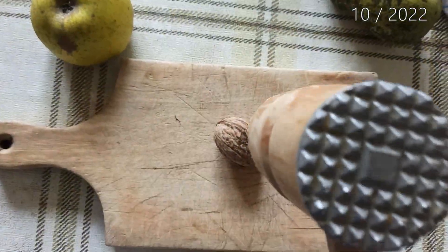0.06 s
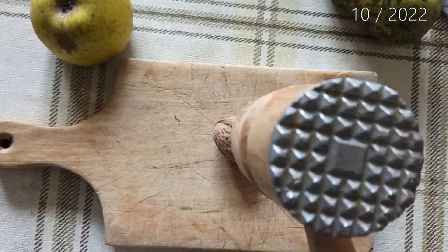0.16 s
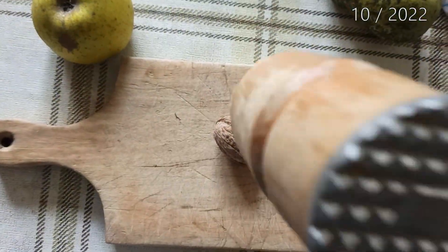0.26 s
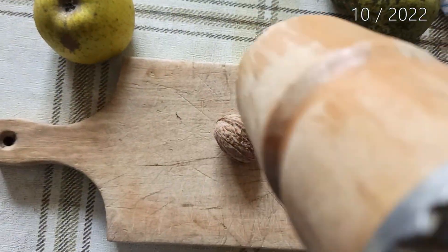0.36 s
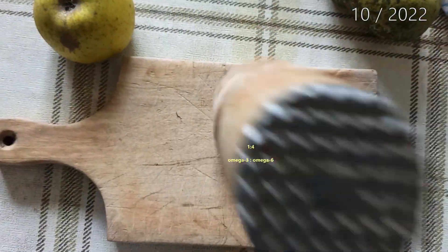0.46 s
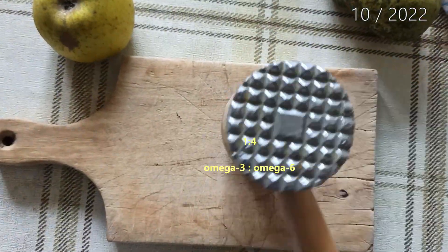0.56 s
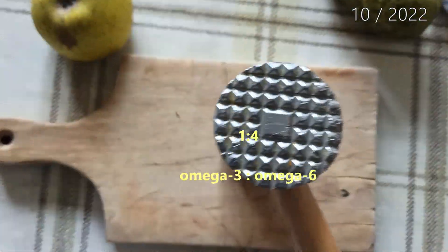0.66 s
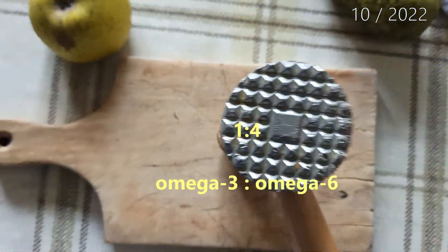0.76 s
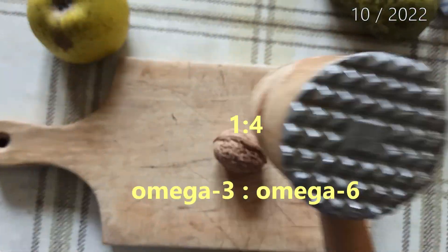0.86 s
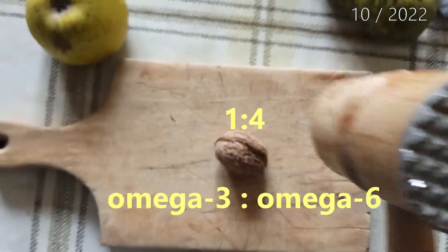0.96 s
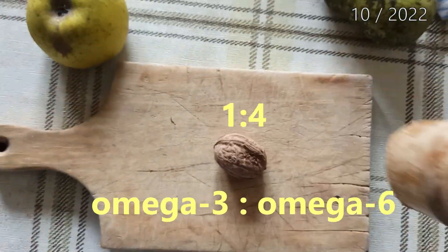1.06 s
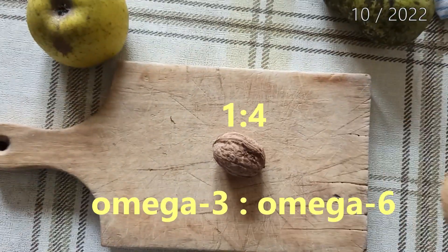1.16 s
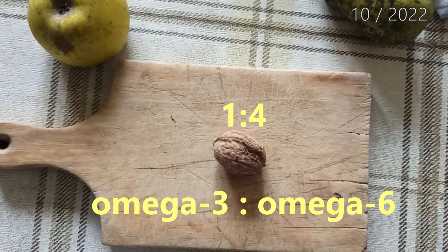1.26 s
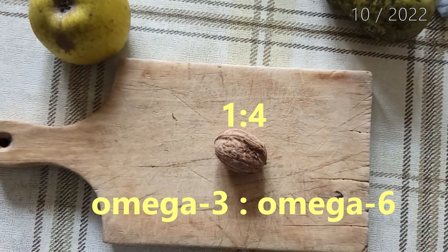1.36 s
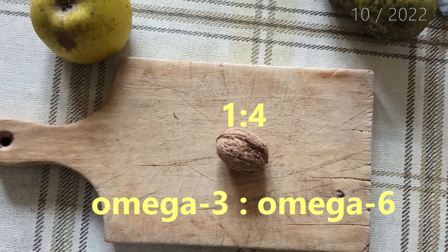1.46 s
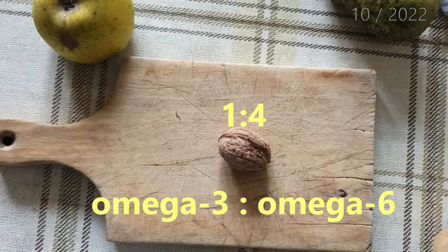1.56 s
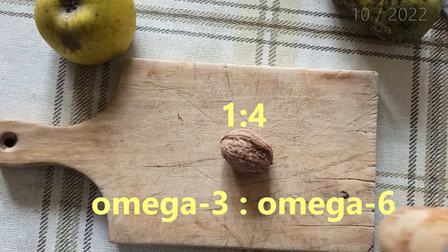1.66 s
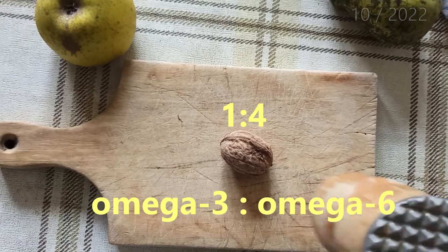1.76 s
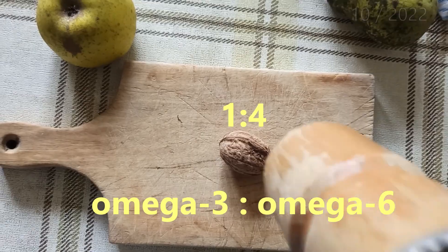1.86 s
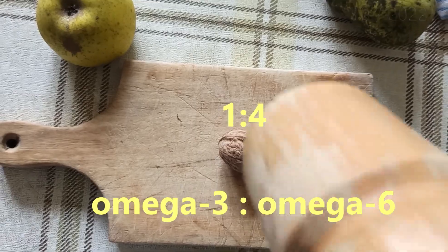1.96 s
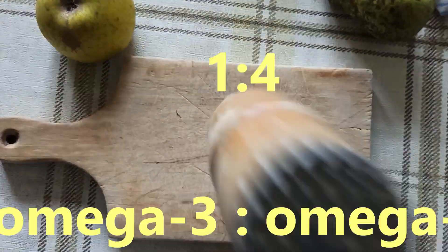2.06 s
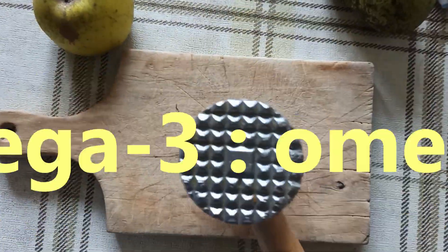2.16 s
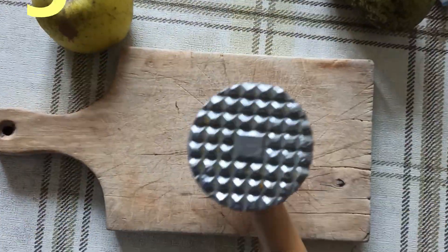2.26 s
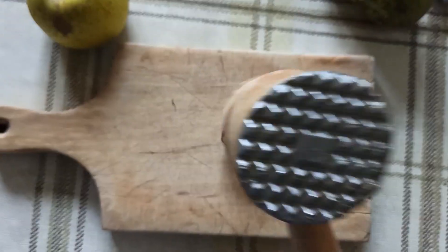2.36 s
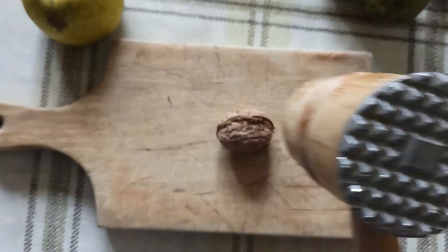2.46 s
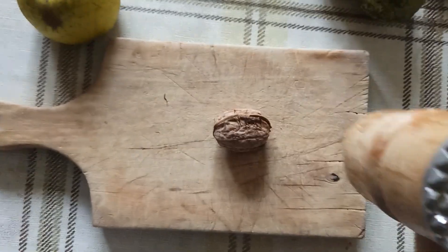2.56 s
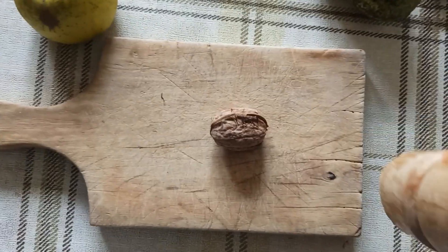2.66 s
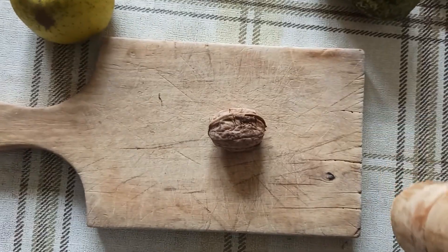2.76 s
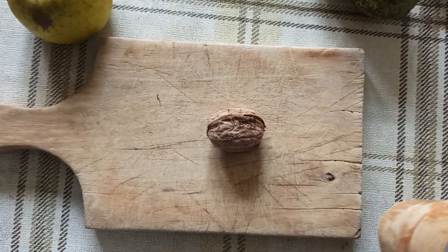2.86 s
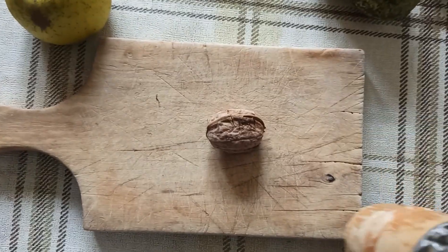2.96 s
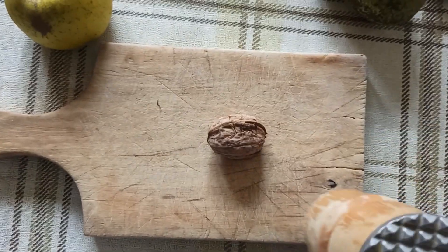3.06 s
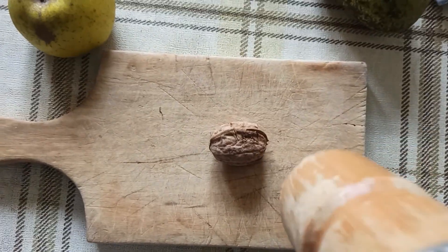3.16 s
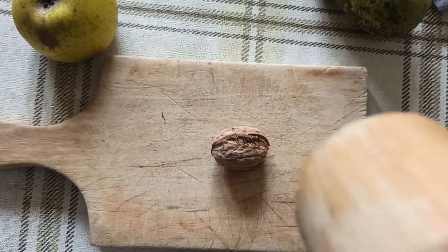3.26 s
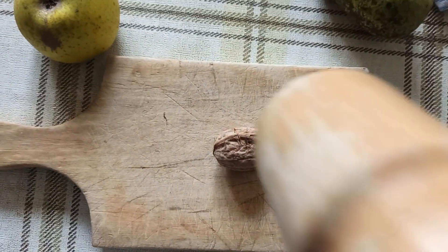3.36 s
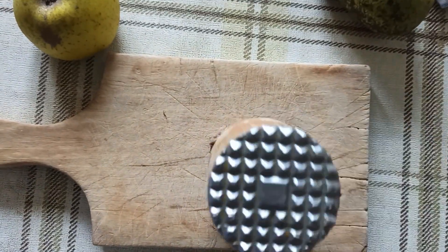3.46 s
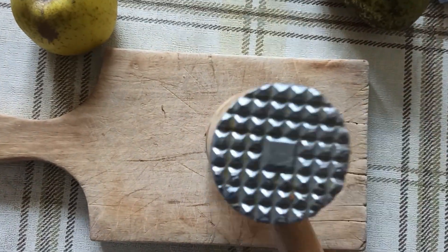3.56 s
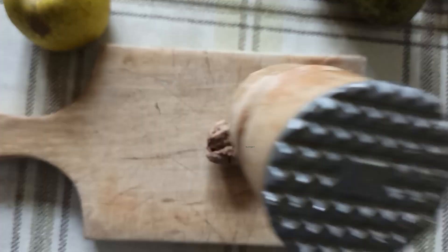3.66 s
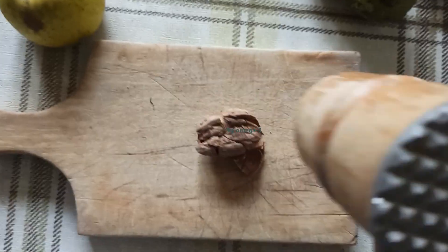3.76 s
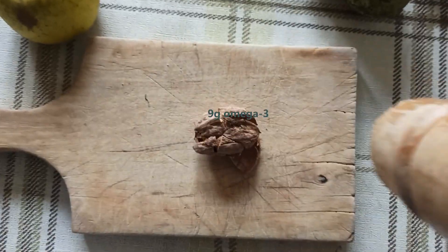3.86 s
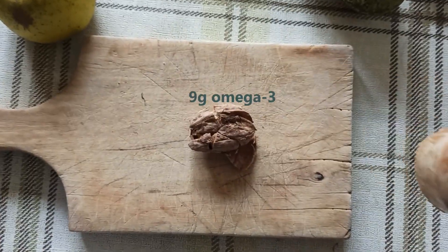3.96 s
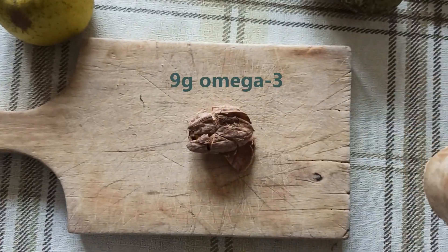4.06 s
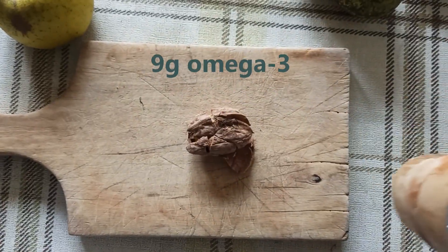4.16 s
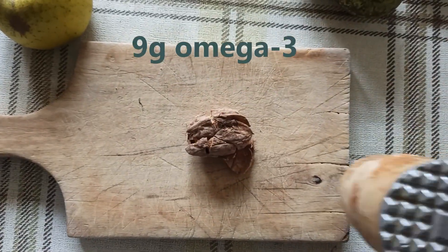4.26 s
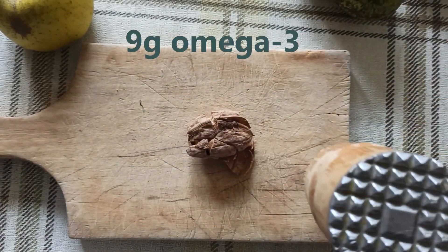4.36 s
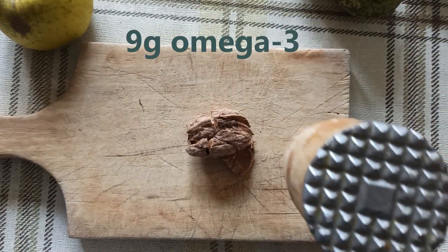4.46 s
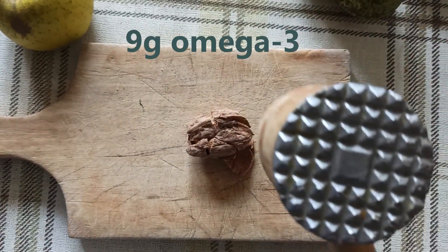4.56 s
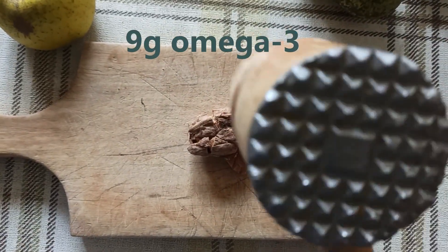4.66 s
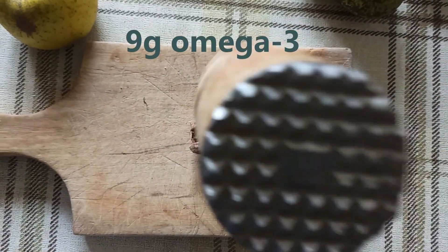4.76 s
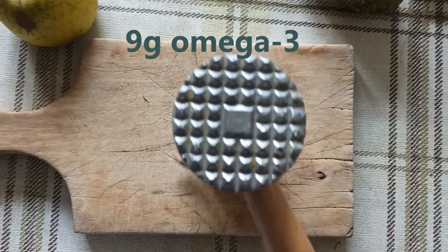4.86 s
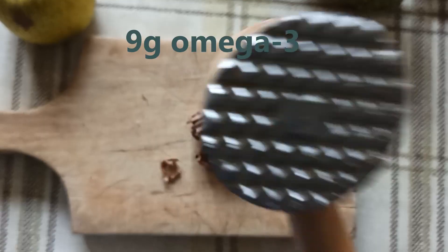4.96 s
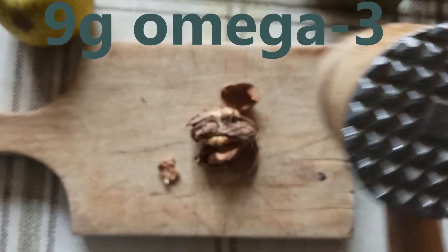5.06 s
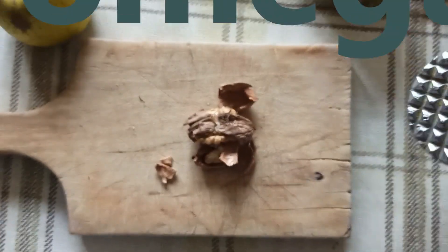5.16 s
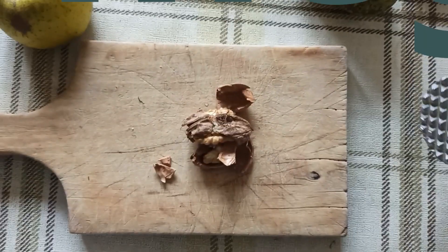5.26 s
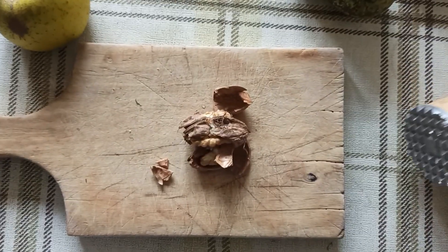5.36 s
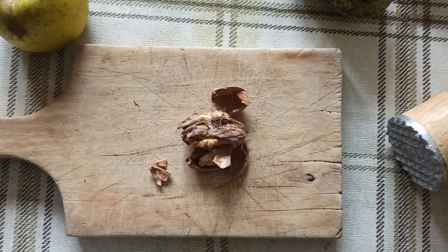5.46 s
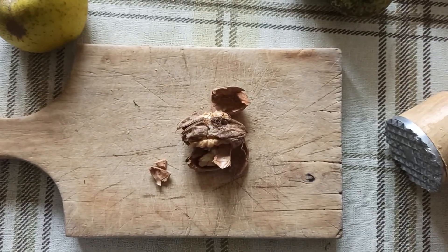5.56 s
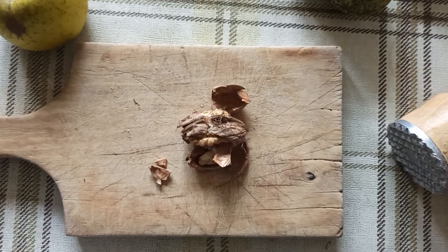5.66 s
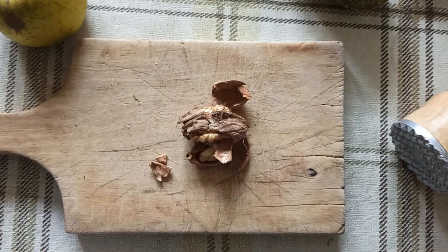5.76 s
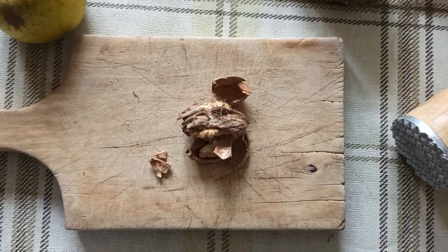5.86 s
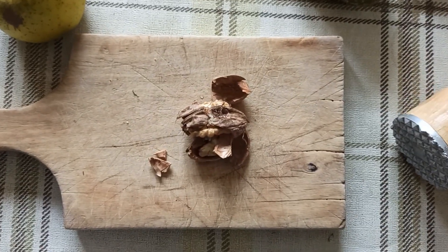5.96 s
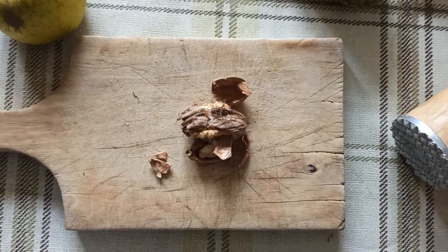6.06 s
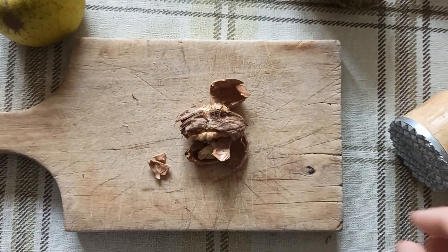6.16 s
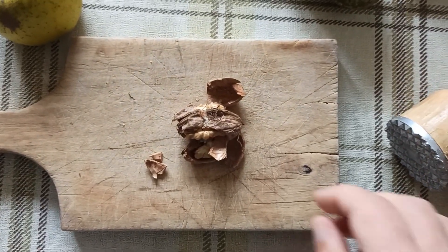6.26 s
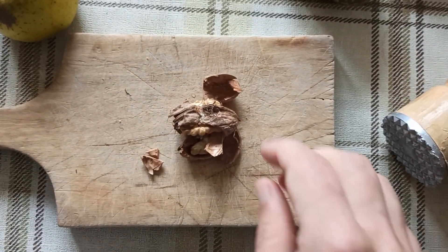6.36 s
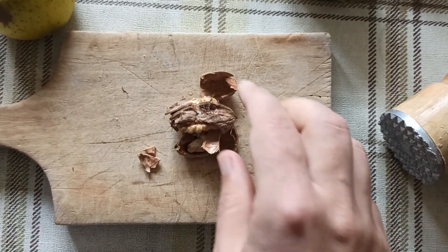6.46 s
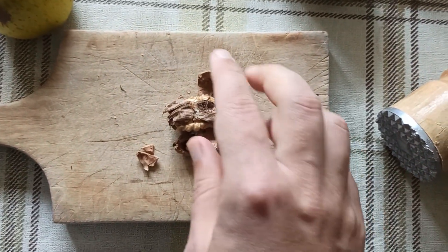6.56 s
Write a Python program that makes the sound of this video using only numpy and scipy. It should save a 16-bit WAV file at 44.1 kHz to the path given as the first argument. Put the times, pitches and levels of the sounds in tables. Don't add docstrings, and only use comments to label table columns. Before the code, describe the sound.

A quiet kitchen with hard walls, heard close by a phone: a soft low fridge hum with airy hiss, and a very faint distant clock stepping once a second. At 0.6 s a mallet hits a walnut on a wooden board, a dull hard crack with a strong woody knock and table drum; the nut hops and lands sharply at 0.64 s. At 2.2 s comes a louder, crunchier blow, the halves giving way just after. At 3.5 s a brighter crack has less board, and a tiny crumb ticks near 3.9 s. At 4.9 s the last blow is brightest and most brittle, with a weaker knock. Crumbs patter from 5.2 s. At 5.36 s the mallet head lands on cloth with a hollow ringing clunk around 1 kHz, then rocks with cushioned thuds until 5.5 s. A faint late thud and crumb ticks come near 5.95 s, then only hum remains.

```python
import sys
import numpy as np
from scipy import signal
from scipy.fft import rfft, irfft
from scipy.io import wavfile
from scipy.ndimage import uniform_filter1d, map_coordinates

SR = 44100
rng = np.random.default_rng(int(sys.argv[2]) if len(sys.argv) > 2 else 0)


def inscribe(sig):
    pcm = np.round(np.clip(np.atleast_2d(sig).T, -1, 1) * 32767)
    wavfile.write(sys.argv[1], SR, pcm.astype(np.int16))


def volts(x):
    e = np.asarray(x, float) / 20
    return 10 ** e


N = 291501
T = np.arange(SR) / SR


def unit(x):
    return x / np.sqrt(np.mean(x ** 2) + 1e-20)


def along(points, hz):
    f, v = np.transpose(points)
    return np.interp(np.log(hz + 1), np.log(f + 1), v)


def noise(spectrum, size, tilt_db=0, humps=()):
    hz = np.fft.rfftfreq(size, 1 / SR)
    level = along(spectrum, hz) + tilt_db * np.log2(hz / 2000 + 0.0907)
    for centre, width, db in humps:
        level += db / (1 + (2 * (hz - centre) / width) ** 2)
    return unit(irfft(rfft(rng.standard_normal(size)) * volts(level), size))


def wobble(rate):
    return map_coordinates(rng.standard_normal(200), [np.arange(N) * rate / SR % 199])


def add(track, s, sound):
    start = round(s * SR)
    track[start:start + len(sound)] += sound[:len(track) - start]


def ring(modes, attack, spread):
    total = np.zeros(SR)
    for k, (hz, db, t60) in enumerate(modes):
        strength, detune = spread * rng.standard_normal(2)
        decay = volts(db + 5.7 * strength - 60 * T / t60)
        total += (-1) ** (k + 1) * decay * np.sin(2 * np.pi * hz * (1 + 0.0028 * detune) * T)
    return total * (1 - np.exp(-T / attack))


# f/Hz, t60/s
KITCHEN_T60 = [(60, 0.46), (150, 0.56), (400, 0.43), (1000, 0.47), (2500, 0.48), (6000, 0.39),
               (12000, 0.32)]


def echo(spectrum, rise, tilt_db=0):
    hz, t, z = signal.stft(noise(spectrum, SR, tilt_db), SR, nperseg=512)
    decay = volts(-60 * t / along(KITCHEN_T60, hz)[:, None])
    tail = signal.istft(z * decay, SR, nperseg=512)[1][:SR]
    return tail * (1 - np.exp(-T / rise))


# f/Hz, level/dB
AIR = [(30, -21), (60, 0), (90, 5.5), (200, 2), (500, -2.5), (1000, -6.5), (1450, -6.5), (2200, -12),
       (3000, -20.5), (4200, -21), (7000, -16.5), (11000, -19), (12700, -20), (15500, -25.5)]
# f/Hz, width/Hz, level/dB
HOUSING = [(162, 17, 1.5), (220, 14, 10.5), (347, 18, 5.5), (445.5, 8.9, 5), (1351, 42, 9), (1439, 26, 9.5),
           (1530, 10.6, 15), (1870, 36, 7), (3465, 350, 6.5), (4200, 410, 8), (9960, 390, 6.5),
           (12680, 430, 14.5)]
# f/Hz, level/dB
MOTOR = [(99.5, -63.5), (2681, -84.5), (2729, -81.5), (4527, -85.5), (12236, -99)]


def fridge():
    z = signal.stft(noise(AIR, N + 512, humps=HOUSING), nperseg=512)[2]
    patches = uniform_filter1d(rng.standard_normal(z.shape), 5, 0)
    patches = uniform_filter1d(patches, 12, 1)
    air = signal.istft(z * volts(0.82 * unit(patches)), nperseg=512)[1][:N]
    out = volts(-57.5 + 0.17 * wobble(1.31)) * air
    t = np.arange(N) / SR
    for hz, db in MOTOR:
        level = volts(db + 3 + 0.7 * wobble(30))
        out += level * np.sin(2 * np.pi * hz * t + 0.25 * wobble(5.5))
    return out


# f/Hz, level/dB
ESCAPEMENT = [(1500, -18), (3000, -12.5), (4300, -13.5), (5600, -7), (6300, -14), (7600, -5.5),
              (10000, -32), (14000, -44)]


def clock():
    out = np.zeros(N)
    metal = [(5580, -5, 0.15), (6300, 3.5, 0.18), (7560, -14, 0.39)]  # f/Hz, level/dB, t60/s
    for step in range(N // SR + 1):
        lines = ring(metal, 0.017, spread=0)
        level_db = -61 + 5 * (step % 2)
        add(out, 0.248 + step, volts(level_db) * (echo(ESCAPEMENT, 0.019) + volts(-5) * lines))
    return out


# t/s, peak level/dB, f/Hz
CRUMBS = [(0.928, -59, 4390), (3.9444, -59, 3600), (4.4094, -59, 12700), (5.2019, -54, 6370),
          (5.216, -60, 6400), (5.226, -49, 6600), (5.436, -48.5, 6800), (5.445, -50, 7000),
          (5.4874, -56, 6400), (5.508, -48.5, 6580), (5.5134, -56, 3210), (5.55, -51, 7500),
          (5.9243, -50, 6500), (5.934, -48.5, 6600), (5.9807, -51.5, 7460)]


def crumbs():
    out = np.zeros(N)
    t = T[:2048]
    for s, db, hz in CRUMBS:
        tick = noise([(hz / 5.3, -16), (hz, 0), (hz * 1.6, -6), (hz * 2.2, -24)], 2048)
        add(out, s, volts(db - 60 * t / 0.022) * (1 - np.exp(-t / 0.00056)) * tick)
    return out


HEAD_HZ = 1023
# f/Hz, level/dB, t60/s
HEAD = [(856, -5.5, 0.028), (HEAD_HZ, 3.2, 0.19), (1755, -29.5, 0.17), (2035, -30.5, 0.09),
        (2540, -14, 0.12), (2565, -28, 0.37), (3900, -30, 0.044), (6380, -15, 0.086), (8290, -34, 0.096)]
# f/Hz, level/dB
CLACK = [(500, 11), (2000, 5.5), (4200, -7), (6500, -5.5), (9500, 1.5), (12000, -14)]


def head_lands():
    clack = volts(-19 - 60 * T / 0.081) * noise(CLACK, SR)
    head = ring(HEAD, 0.0023, spread=0) + clack
    walls = volts(-60 * T / 0.85) * echo([(100, -32), (2000, -0.5), (6000, -10), (9000, -8.5)], 0.0033)
    head += volts(-8) * signal.fftconvolve(head, walls / np.linalg.norm(walls))[:SR]
    out = np.zeros(N)
    add(out, 5.362, volts(-12.5) * head)
    return out


# f/Hz, level/dB, t60/s
THUD = [(241, 3.5, 0.079), (481, -9, 0.046), (773, -4.5, 0.027)]
# t/s, wood level/dB, softness f/Hz, thud level/dB, table drum level/dB
RESTS = [
    (5.362, -28.5, 1500, -15.5, -30),
    (5.4383, -23, 940, -16.5, -26.5),
    (5.455, -27.5, 980, -40.5, -44),
    (5.511, -33, 705, -24, -40),
    (5.939, -39.5, 900, -30, -62),
    (5.973, -44.5, 593, -44, -69),
]


def rests():
    out = head_lands()
    for s, wood_db, soft_hz, thud_db, _ in RESTS:
        wood = volts(wood_db) * (volts(-4) * ring(BOARD, 0.0094, spread=0.76) + echo(BOOM, 0.00074))
        cushion = signal.butter(3, max(soft_hz, 300), fs=SR, output="sos")
        modes = [(hz * (soft_hz / 900) ** 0.21, db, t60) for hz, db, t60 in THUD]
        thud = volts(thud_db) * ring(modes, 0.0028, spread=0)
        add(out, s, signal.sosfilt(cushion, wood) + thud)
    return out


def jolts():
    out = np.zeros(N)
    push = T / 0.0025 * np.exp(1 - T / 0.0015)
    damping = volts(-56 * T - 60 * (T / 0.47) ** 2.8)
    drum = damping * np.sin(2 * np.pi * 123.9 * T) * (1 - np.exp(-T / 0.003))
    for s, crack_db, *_ in BLOWS:
        jolt = volts(-1 + 1.35 * crack_db) * push + volts(-15.5 + 0.31 * crack_db) * drum
        add(out, s + 0.0013, jolt)
    s, _, knock_db = HOPS[-1]
    add(out, s + 0.0056, volts(knock_db - 16) * drum)
    for s, _, _, thud_db, drum_db in RESTS:
        add(out, s, volts(thud_db - 15) * push + volts(drum_db) * drum)
    return out


# t/s, f/Hz, level/dB, t60/s
TONES = [(0.593, 1173, -5, .037), (0.594, 250, -6, 0.058), (2.1826, 200, -30, 0.096),
         (0.6427, 4700, -18, 0.012), (0.659, 1406, -12.5, 0.022), (2.179, 4786, -15, 0.04),
         (2.1803, 1750, -12, 0.015), (3.141, 311, -51.5, 0.35), (3.5291, 2680, -2.5, 0.0073),
         (4.42, 620, -42, 0.016), (4.419, 1260, -43.5, .018), (4.9055, 1263, -8, 0.035),
         (4.93, 255, -22, .3), (4.9059, 1790, -7, 0.016), (5.362, 800, -12.5, .02), (5.44, 603, -19.5, .17),
         (5.498, 250, -31, 0.21), (5.941, 368, -28.5, 0.15), (5.941, 221, -31, .36)]


def table():
    out = jolts()
    for s, hz, db, t60 in TONES:
        add(out, s, ring([(hz, db, t60)], 0.00039, spread=0))
    walls = echo([(300, -0.5), (1200, -0.5), (2100, -3), (4700, -2.5)], 0.002)
    out += volts(-12) * signal.fftconvolve(out, walls / np.linalg.norm(walls))[:N]
    return out


# t/s, crack level/dB, knock level/dB, late room level/dB, tilt/(dB per octave)
BLOWS = [
    (0.5915, -5.5, -10.5, -31, -3),
    (2.1789, -3, -14.5, -13, -1),
    (3.5293, -5, -22, -15.5, 0.25),
    (4.9056, -8, -25.5, -20.5, 1.5),
]
# t/s, crack level/dB, knock level/dB
HOPS = [
    (0.641, -13, -22),
    (0.653, -36, -24),
]


def contacts():
    rows = []
    for s, crack, knock in HOPS:
        rows.append((s, crack, knock, knock - 30, crack - 48.5, -4.5))
    for s, crack, knock, late, tilt in BLOWS:
        rows.append((s, crack, knock, knock + 2, crack - 18.5, tilt))
        rows.append((s + 0.018, late - 15, late - 12.5, late, late - 10.5, 5.7 * tilt))
    return rows


# f/Hz, level/dB, t60/s
BOARD = [(178, 1, 0.094), (221, 0, 0.25), (250, 3.5, 0.24), (309, -16, 0.54), (367, -2, 0.14),
         (436.3, -6, 0.24), (576, -9.5, 0.27), (661, -5, 0.16), (744, -4, 0.1), (1207, -35, .04),
         (1470, -2, 0.033)]
# f/Hz, level/dB
SHELL = [(300, -70), (800, 0.5), (1400, 3), (3000, -7), (5000, -9), (7000, 1.5), (10000, -5.5),
         (14000, -14), (18000, -29)]
# f/Hz, width/Hz, level/dB
HUSK = [(1760, 153, 2.5), (2590, 540, 4.5), (4700, 310, 0.5), (6900, 4100, -3.5), (13740, 1400, 10)]
# f/Hz, level/dB
BOOM = [(30, 0), (80, -15.5), (125, -9), (230, 2.5), (400, -3), (700, -6), (1000, -22), (2000, -22.5),
        (4000, -37.5)]


def blows():
    out = np.zeros(N)
    splinter = (1 - np.exp(-T / 0.0013)) * (np.exp(-(T / 0.0038) ** 4) + 0.55 * volts(-60 * T / 0.077))
    burst = np.exp(-((T - 0.0028) / 0.0015) ** 2)
    for s, crack_db, knock_db, boom_db, bright_db, tilt_db in contacts():
        crack = splinter * noise(SHELL, SR, tilt_db, HUSK)
        shatter = burst * noise(SHELL, SR, tilt_db + 3, HUSK)
        add(out, s, volts(crack_db) * (0.76 * crack + 0.78 * shatter))
        add(out, s, volts(knock_db) * ring(BOARD, 0.0024, spread=0.96))
        add(out, s, volts(boom_db) * echo(BOOM, 0.0063))
        add(out, s, volts(bright_db) * echo(SHELL, 0.0006, tilt_db))
    return out


def scene():
    return (fridge() + clock() + crumbs() + rests() + table() + blows())[None]


# upper edge f/Hz, gain level/dB
STEPS = [(45, -19.5), (75, -26), (950, 0), (1300, -1), (2050, 1.5), (3400, 0), (4050, 3), (4750, 4.5),
         (6150, -3.5), (7700, 2), (8550, -3), (11600, -19), (13000, -3), (15800, 0.5), (16300, -16)]


def equalise(x, reach):
    edges, gain_db = np.transpose(STEPS)
    hz = np.fft.rfftfreq(8192, 1 / SR)
    gain = np.append(volts(gain_db), 0)[np.searchsorted(edges, hz)]
    taps = np.fft.fftshift(irfft(gain))
    lag = np.abs(np.arange(8192) - 4096) / SR
    window = np.clip((reach - lag) / 0.0058, 0, 1)
    return signal.fftconvolve(x, taps * window, "full")[4096:4096 + N]


def squeeze(x, knee_db, share, release_db):
    slope = release_db * np.arange(N) / SR
    level = 10 * np.log10(np.abs(uniform_filter1d(x ** 2, size=100, origin=25)) + 1e-12)
    held = np.maximum.accumulate(level + slope) - slope
    excess = uniform_filter1d(np.maximum(held - knee_db, 0), size=40)
    return x * volts(-share * excess)


def low_pass(x):
    return signal.sosfilt(signal.butter(12, 16810, fs=SR, output="sos"), x)


def record(dry):
    coloured = equalise(dry[0], reach=0.016)
    mix = squeeze(coloured, knee_db=-24.5, share=0.44, release_db=118)
    return low_pass(mix[None])


dry = scene()
out = record(dry)
inscribe(out)
```